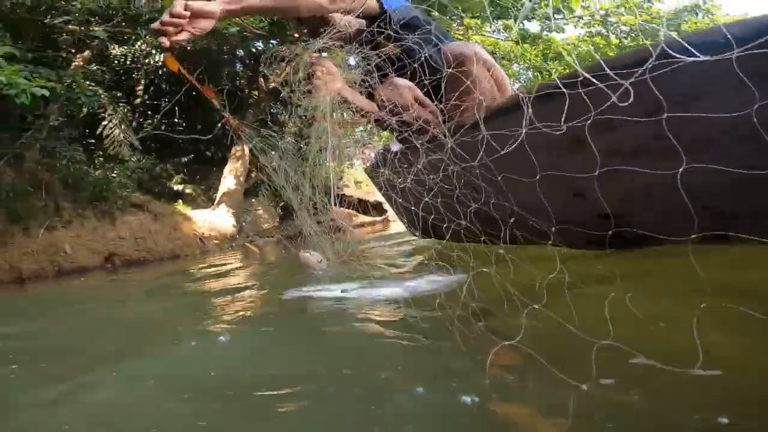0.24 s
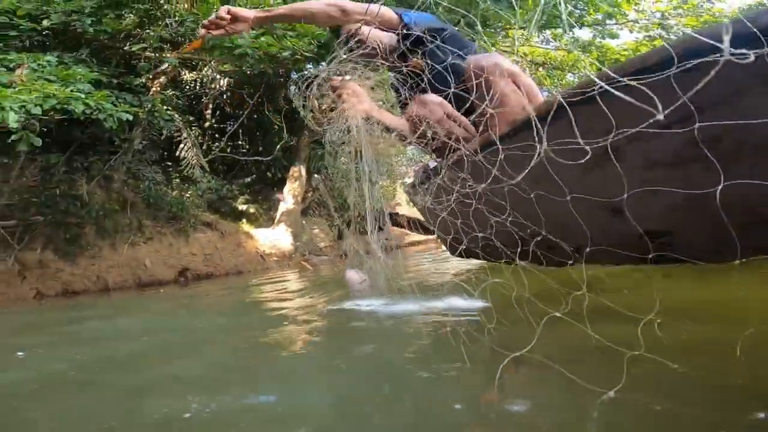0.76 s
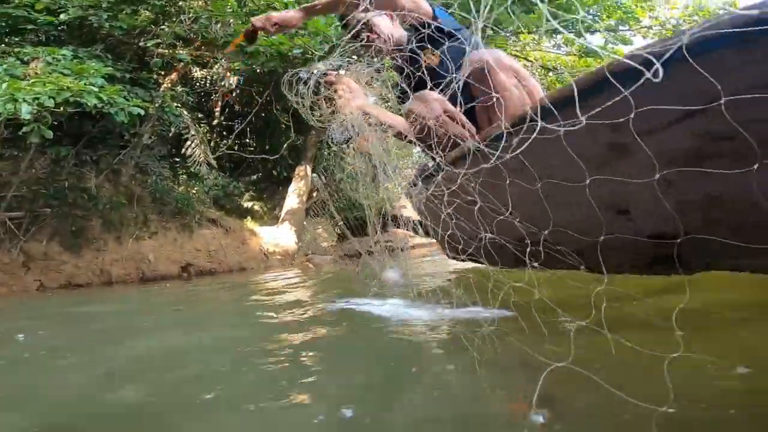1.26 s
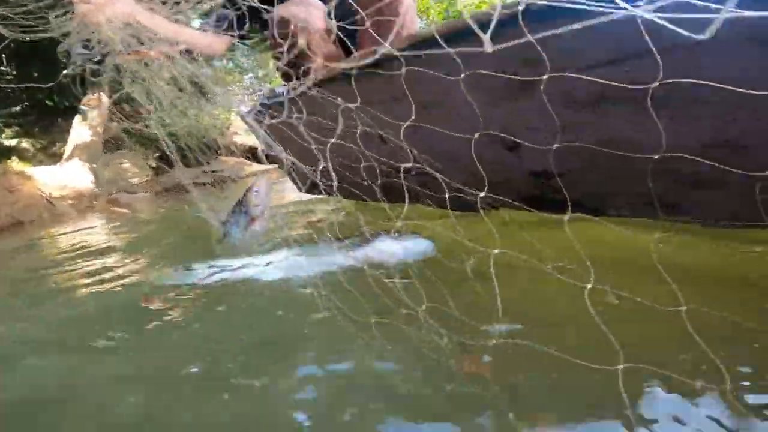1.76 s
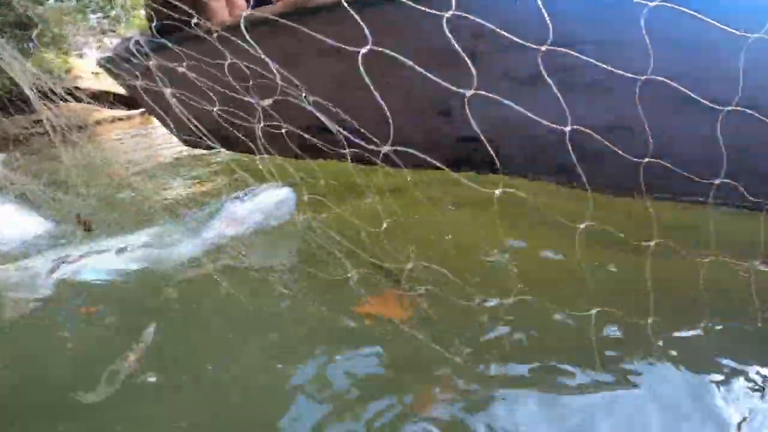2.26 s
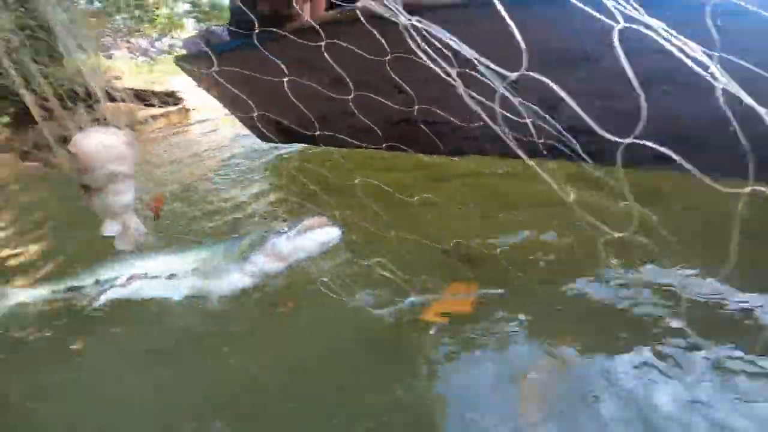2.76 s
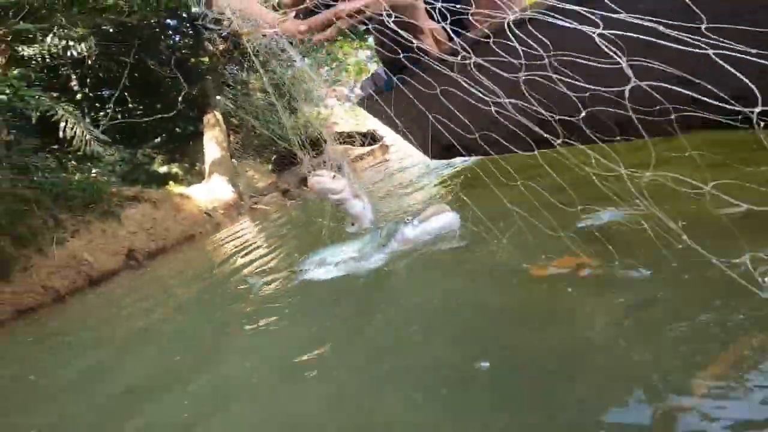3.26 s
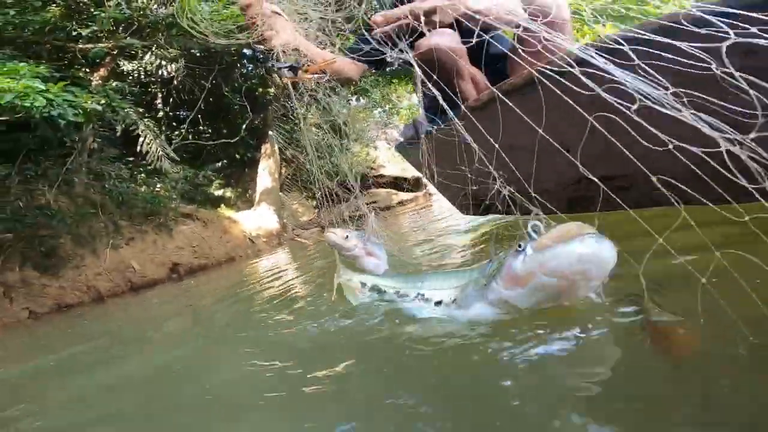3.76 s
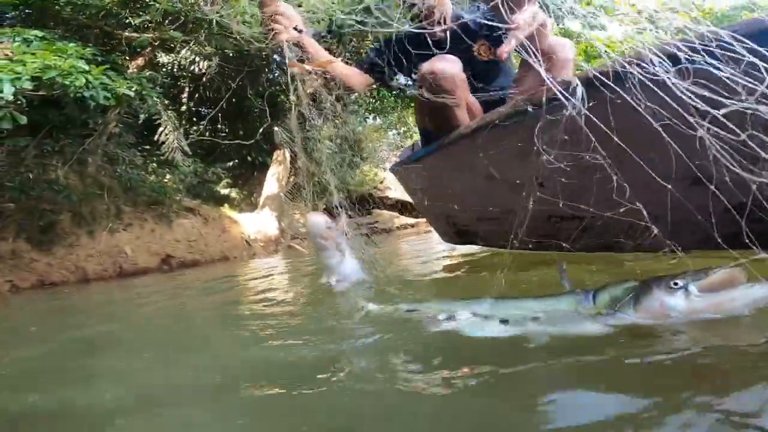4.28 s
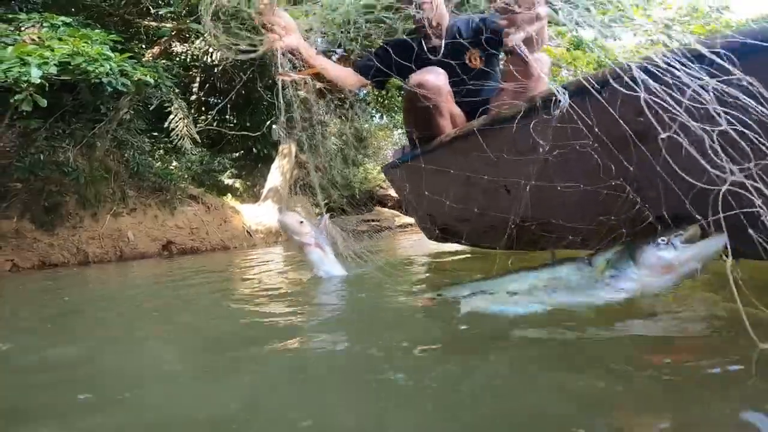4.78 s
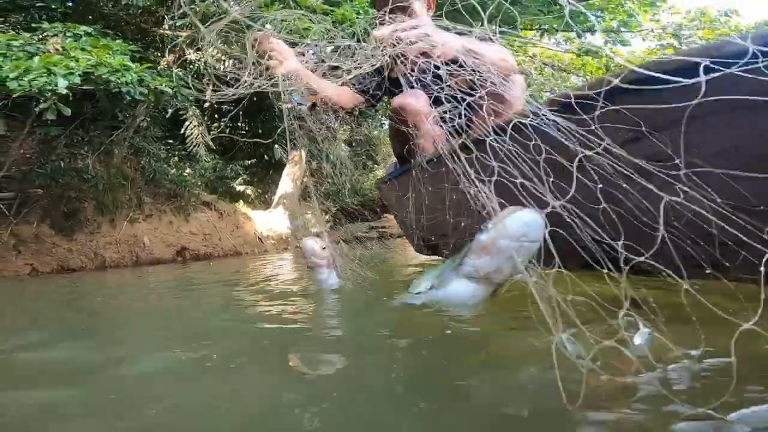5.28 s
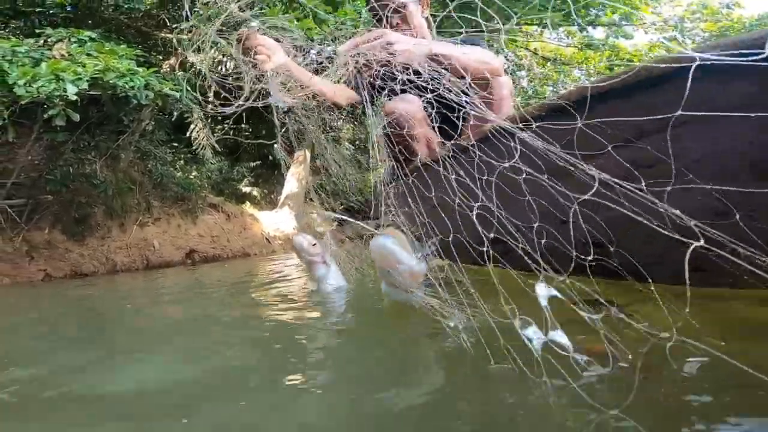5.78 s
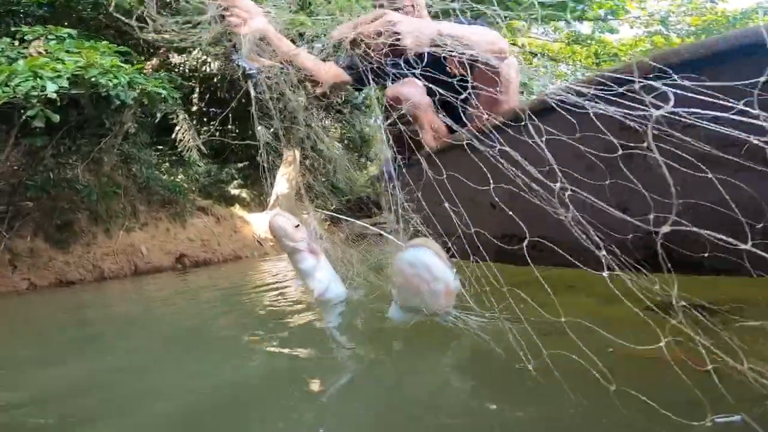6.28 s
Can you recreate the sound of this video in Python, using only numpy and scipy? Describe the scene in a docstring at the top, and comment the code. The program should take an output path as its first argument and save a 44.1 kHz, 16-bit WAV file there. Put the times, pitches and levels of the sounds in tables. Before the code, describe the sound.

Close, boxy and muffled sound from a waterproof-cased camera just above a river. A wet net is pulled in jerks: grainy scraping, hollow knocks, dry snaps, fizzing water and a quick gurgle at first. It eases, then a busier cluster of knocks and drips peaks past the middle. Afterwards come droplets, a short creak, near quiet and a few light rubs over faint low rumble.

```python
"""On a river, a wet fishing net is hauled into a wooden boat, heard by a waterproof camera just above the water.
Net: grainy noise gated by jerks rubs with each pull; struck case modes knock dully; noise bursts snap and flick spray.
Water: crowds of decaying sines are the bubbles that churn, crackle, gurgle, drip and drain.
Boat and air: a taut line creaks in a train of rasps, low swings bump the hull, a hollow note wanders.
The moving camera rumbles in low noise over a very quiet bank; the air in its case colours everything."""
import sys
import numpy as np
from scipy import signal
from scipy.fft import rfft, irfft, next_fast_len
from scipy.io import wavfile
from scipy.ndimage import uniform_filter1d

SR = 44100
rng = np.random.default_rng(int(sys.argv[2]) if len(sys.argv) > 2 else 0)


def inscribe(sig):
    """Save sig as 16-bit PCM at rate SR to the path in sys.argv[1].

    A 1-D sig is mono; a 2-D sig holds one channel per row.
    Samples are clipped to [-1, 1] before scaling.
    """
    pcm = np.round(np.clip(np.atleast_2d(sig).T, -1, 1) * 32767)
    wavfile.write(sys.argv[1], SR, pcm.astype(np.int16))


N = 287973
T = np.arange(N) / SR
TOP_HZ = 8300  # above this the treble is faint

# All source levels are relative, ahead of the ports and the case.
# Sway of the camera. Each row: time in seconds, rumble level in dB.
SWAY = [(0.0, -36), (0.14, -43), (0.95, -41.5), (1.28, -52), (1.98, -44), (2.25, -49), (2.7, -46.5),
        (2.95, -42.5), (3.7, -39.5), (3.88, -48), (5.27, -53), (5.4, -57), (5.68, -59), (5.91, -75),
        (6.2, -55.5), (6.53, -44)]


def undb(db):
    """Decibels to gain."""
    return 10 ** (np.asarray(db) / 20)


def curves(table):
    """Each column of a table, joined by straight lines in time."""
    s, *columns = np.transpose(table)
    return [np.interp(T, s, c) for c in columns]


def across(table, freqs):
    """Each column of a table, joined by straight lines in log frequency."""
    hz, *columns = np.transpose(table)
    log_freqs = np.log(np.maximum(freqs, 1))
    log_hz = np.log(np.maximum(hz, 1))
    return [np.interp(log_freqs, log_hz, c) for c in columns]


def shaped(x, response):
    """Filter by a response given as a function of frequency."""
    size = next_fast_len(N + SR // 10)
    return irfft(rfft(x, size) * response(np.fft.rfftfreq(size, 1 / SR)), size)[..., :N]


def colour(x, table):
    """Filter by the gains of a (Hz, dB) table."""
    return shaped(x, lambda f: undb(across(table, f)[0]))


def band(x, lo_hz, hi_hz, order=3):
    """Causal Butterworth band-pass."""
    edges_hz = [lo_hz, min(hi_hz, SR / 2 - 1)]
    return signal.sosfilt(signal.butter(order, edges_hz, "band", fs=SR, output="sos"), x)


def unit(x):
    """Scale to rms 1."""
    return x / np.sqrt(np.mean(x ** 2))


def peak(x):
    """Scale to peak 1."""
    return x / np.abs(x).max()


def fade(t, t60_s):
    """Exponential decay of 60 dB in t60_s."""
    return np.exp(-np.log(1000) * t / max(t60_s, 1 / SR))


def add(out, s, x):
    """Mix a short sound in at s seconds."""
    i = max(int(s * SR), 0)
    out[i:i + len(x)] += x[:max(N - i, 0)]


def walk(rate_hz):
    """Random levels, rate_hz new ones a second, joined by ramps; rms 1."""
    k = int(SR / rate_hz)
    held = np.repeat(rng.standard_normal(N // k + 1), k)
    return unit(uniform_filter1d(held, k)[:N])


def slips(rate_hz, spread_db):
    """Two unrelated streams of tiny clicks at random times, their sizes spread exponentially in dB."""
    chance = rng.random((2, N))
    size = np.minimum(rng.exponential(size=(2, N)), 4)
    sign = rng.choice([-1, 1], (2, N))
    return unit((chance < rate_hz / SR) * undb(spread_db * size) * sign)


def ports(shared, apart=None):
    """Two microphone ports differ in level and phase; a spread-out source reaches them less alike in the treble."""
    # Each row: frequency in Hz, left minus right in dB, left lead in rad, likeness 0-1.
    port_rows = [(60, 1.8, 0, .98), (300, 1.6, -.12, .95), (520, 2.2, -.15, .92), (780, 4.2, .2, .88),
                 (1300, 3.4, -.25, .88), (1900, 6, 0, .85), (2800, 8.5, -.65, .8), (3600, 5, -.6, .65),
                 (4700, -4, -2.1, .55), (6000, 1.5, -2.3, .4), (8000, 2.5, -.6, .2)]

    def ear(f, side):
        balance_db, lead_rad, _ = across(port_rows, f)
        return undb(side * balance_db / 2) * np.exp(1j * lead_rad * min(side, 0))

    def likeness(f):
        return np.clip(across(port_rows, f)[2], 0, 1)

    if apart is None:
        return np.array([shaped(shared, lambda f: ear(f, side)) for side in (1, -1)])
    shared = shaped(shared, lambda f: np.sqrt((1 + likeness(f)) / 2))
    apart = shaped(apart, lambda f: np.sqrt((1 - likeness(f)) / 2))
    return np.array([shaped(shared + side * apart, lambda f: ear(f, side)) for side in (1, -1)])


def bubble(t, hz, t60_s, rise):
    """A trapped air bubble rings and rises in pitch as it nears the surface."""
    glide = 1 + rise * np.minimum(t / t60_s, 1)
    return np.sin(2 * np.pi * np.cumsum(hz * glide) / SR) * fade(t, t60_s)


def bank(hush_db=-80.5, hiss_db=-96):
    """A faint, slightly wavering noise hush with a thin high hiss above it."""
    # Each row: frequency in Hz, relative gain in dB.
    bank_colour = [(35, -28), (60, 6.5), (124, -10), (532, -15.5), (616, -8.5), (820, -23.5), (1390, -10.5),
                   (2000, -30.5), (2380, -18.5), (2530, -27.5), (2810, -19.5), (3390, -38.5), (4600, -28.5),
                   (5900, -30), (7310, -26), (8630, -37.5), (11200, -43.5), (19000, -120)]
    hush = colour(rng.standard_normal((2, N)) * undb(0.6 * walk(rate_hz=10)), bank_colour)
    hush *= undb(hush_db) / band(hush, 300, 9000).std()
    hiss = unit(band(rng.standard_normal((2, N)), 6950, 7950, order=4))
    return ports(*hush) + undb(hiss_db) * hiss


def rumble():
    """The swaying camera flexes its case: deep, lumpy noise from one signal at both ports."""
    lumps = rng.standard_normal(N) * undb(1.0 * walk(rate_hz=8.5))
    deep = colour(lumps, [(8, -15.5), (20, 8.0), (40, 2.5), (55, -1.5), (80, -8.0), (110, -21.0),
                          (160, -28.5), (300, -70.5), (600, -100)])
    return ports(unit(deep) * undb(curves(SWAY)[0]))


def hollow(width_hz=14):
    """A narrow resonance of the air between camera and water glides up and down, fluttering apart at each port."""
    # Each row: time in seconds, pitch in Hz, level in dB.
    note_rows = [(4.6, 301, -100), (4.85, 340, -78), (4.95, 261.7, -86), (5.13, 367, -86.5),
                 (5.46, 265, -84), (5.53, 316, -93), (5.58, 233.3, -79.5), (5.68, 396.5, -84),
                 (5.8, 287, -83), (5.92, 379, -82), (6.03, 308, -81), (6.13, 250, -68.5), (6.26, 344, -83),
                 (6.5, 303, -81)]
    hz, db = curves(note_rows)
    lowpass = signal.butter(2, width_hz, fs=SR, output="sos")
    flutter = signal.sosfilt(lowpass, rng.standard_normal((2, 2, N)))
    carrier = np.exp(2j * np.pi * np.cumsum(hz) / SR)
    note = np.real((flutter[0] + 1j * flutter[1]) * carrier)
    return unit(note) * undb(db)


def bumps(t60_s=0.031):
    """A soft shove on the hull: one low swing that is damped almost at once."""
    # Each row: time in seconds, peak in dB, pitch in Hz.
    bump_rows = [(0.439, -30.5, 54.7), (1.998, -34.5, 72), (3.2, -36, 84), (3.412, -36.5, 72),
                 (3.475, -34.5, 71.4), (3.862, -43, 106), (4.74, -44.5, 85), (4.846, -45.5, 91),
                 (5.031, -45, 85), (5.147, -44, 98), (5.254, -45, 70)]
    out, t = np.zeros(N), T[:SR // 10]
    for s, db, hz in bump_rows:
        swing = t * np.sin(2 * np.pi * hz * t) * fade(t, t60_s)
        add(out, s, -undb(db) * peak(swing))
    return ports(out)


def gurgles(spread_octaves=0.42, count=14):
    """A slop of water traps a cluster of large, short-lived bubbles that swells and dies away."""
    # Each row: start in seconds, length in seconds, level in dB, centre pitch in Hz.
    gurgle_rows = [(0.316, 0.14, -50.5, 657), (4.305, 0.082, -64, 443), (4.711, 0.07, -65, 485),
                   (4.757, 0.13, -66.5, 186), (5.299, .14, -68, 477), (5.612, 0.17, -74, 520)]
    out, t = np.zeros(N), T[:SR // 10]
    for (s, length_s, db, hz), chance in zip(gurgle_rows, rng.random((len(gurgle_rows), count, 3))):
        cluster = np.zeros(SR // 3)
        for k, (when, size, strength) in enumerate(chance):
            place = (k + when) / count
            pitch_hz = hz * 2 ** (spread_octaves * (2 * size - 1))
            pop = bubble(t, pitch_hz, 12 / pitch_hz, rise=0.1)
            add(cluster, place * length_s, np.sin(np.pi * place) * (0.5 + strength) * pop)
        add(out, s, undb(db) * cluster / np.linalg.norm(cluster) * np.sqrt(length_s * SR))
    return ports(out)


def wash(flow, lowest_hz=380, octaves=3.46, t60_cycles=13, spread_db=-4.0, tilt_db=-10.0, level_db=-6,
         count=1300):
    """Water churned by the mesh: a crowd of short-lived bubbles of all sizes, weaker by the tilt per octave up."""
    out, t = np.zeros(N), T[:SR // 25]
    for when, size, strength in rng.random((count, 3)):
        hz = lowest_hz * 2 ** (octaves * size)
        db = spread_db * min(-np.log(1 - strength), 3) + tilt_db * octaves * size
        add(out, when * N / SR, undb(db) * bubble(t, hz, t60_cycles / hz, rise=0.45))
    return ports(unit(out) * flow * undb(level_db))


def trickle(shake, lowest_hz=900, octaves=7.4, t60_cycles=22, level_db=-64, spread_db=2.0, count=150):
    """The raised mesh keeps shedding small drops, more loudly when it is shaken."""
    out, t = np.zeros(N), T[:SR // 16]
    for when, size, strength in rng.random((count, 3)):
        hz = lowest_hz * 2 ** (octaves * size)  # beyond SR / 2 it folds back, very faint and brief
        loudness = undb(spread_db * min(-np.log(1 - strength), 3)) * lowest_hz / hz
        drop = bubble(t, hz, t60_cycles / hz, rise=0.13) * (1 - fade(t, 5 / hz))
        add(out, when * N / SR, loudness * drop)
    shake_db = 20 * np.log10(shake)
    return ports(out * undb(level_db + 0.55 * (shake_db - shake_db.mean())))


def drain(lowest_hz=1000, octaves=2.1, t60_cycles=16, spread_db=12, tilt_db=-1.0, count=130):
    """Fine droplets patter from the lifted net onto the river, each a tiny, quickly damped bubble."""
    # Each row: time in seconds, level of the strongest droplets in dB.
    drain_rows = [(3.9, -84), (4.15, -54), (4.3, -69), (4.55, -60), (4.75, -75), (4.919, -60.5), (5.1, -55),
                  (5.25, -62), (5.45, -85)]
    out, t = np.zeros(N), T[:SR // 30]
    times, levels_db = np.transpose(drain_rows)
    for when, size, strength in rng.random((count, 3)):
        s = times[0] + when * (times[-1] - times[0])
        hz = lowest_hz * 2 ** (octaves * size)
        db = np.interp(s, times, levels_db) - spread_db * strength + tilt_db * octaves * size
        add(out, s, undb(db) * bubble(t, hz, t60_cycles / hz, rise=0.15))
    return ports(out)


def drops(splat_t60_s=0.014, wet_db=8):
    """Water off the net: a brief noise splat and a tiny bubble that bursts at once; the row at 3.657 s instead
    gives the hard knock there its bright click."""
    # Each row: time in seconds, peak in dB, pitch in Hz, relative splat in dB (wet_db is added).
    drop_rows = [(0.169, -32, 2560, -9), (0.188, -39, 4860, -19), (0.294, -46, 3200, -4),
                 (0.7836, -56, 4200, 22), (0.798, -39.5, 3850, 8), (0.8622, -51, 2950, -5),
                 (1.3686, -51.5, 2880, -6), (1.7925, -50, 2630, 4), (1.9493, -51, 2450, -16),
                 (2.066, -49.5, 2970, -9), (2.882, -60, 2600, 21), (2.933, -52, 3100, -8),
                 (3.0004, -52.5, 3380, -9), (3.13, -40.5, 3030, -11), (3.477, -48, 2440, 8),
                 (3.6573, -34, 1970, -7.5), (3.925, -56, 2930, 7), (4.2409, -56, 3200, 2),
                 (4.534, -49.5, 4270, -4), (4.6658, -53, 4700, -11), (4.691, -57.5, 3700, 15),
                 (5.1878, -55.5, 2820, -21)]
    out, t = np.zeros(N), T[:SR // 10]
    for (s, db, hz, splat_db), noise in zip(drop_rows, rng.standard_normal((len(drop_rows), len(t)))):
        splat = peak(band(noise * fade(t, splat_t60_s), hz * 0.72, hz * 1.396))
        ring = bubble(t, hz, 0.032, rise=0.06) * fade(t, 0.025)  # bursting damps it further
        add(out, s, undb(db) * peak(ring + undb(splat_db + wet_db) * splat))
    return ports(out)


def ringing_bubbles(plop_db=-7, plop_t60_s=0.0037):
    """Some bubbles ring on clearly after a soft noise plop."""
    # Each row: time in seconds, level in dB, pitch in Hz, t60 in seconds.
    bubble_rows = [(0.002, -43, 2910, 0.021), (0.017, -47, 4980, 0.01), (1.01, -45, 1070, 0.018),
                   (1.011, -55.5, 2730, 0.027), (1.039, -43.5, 1270, 0.02), (1.7, -52.5, 3120, 0.021),
                   (3.109, -47.5, 2520, 0.009), (3.133, -41.5, 4400, 0.01), (3.318, -40.5, 1380, 0.013),
                   (3.863, -50.5, 2930, 0.023), (4.179, -47.5, 1200, 0.022), (4.242, -46, 2680, 0.013),
                   (4.534, -62.5, 3400, 0.056), (4.578, -55, 1423, 0.03), (4.808, -51.5, 1626, 0.022),
                   (4.857, -66, 3040, 0.031), (5.004, -53.5, 1215, 0.029), (5.053, -52, 1104, 0.072),
                   (5.345, -52, 477, 0.04), (5.434, -60, 4800, 0.016), (6.432, -48, 1490, 0.011)]
    out, t = np.zeros(N), T[:SR // 10]
    for (s, db, hz, t60_s), noise in zip(bubble_rows, rng.standard_normal((len(bubble_rows), len(t)))):
        plop = peak(band(noise * fade(t, plop_t60_s), hz * 0.8, hz * 1.29))
        ring = bubble(t, hz, t60_s, rise=0.2) * (1 - fade(t, 0.0069))
        add(out, s, undb(db) * (ring + undb(plop_db) * plop))
    return ports(out)


def spray():
    """Brief bright puffs of tiny droplets flicked off the mesh."""
    # Each row: start in seconds, length in seconds, level in dB.
    spray_rows = [(0.145, 0.022, -69), (0.196, 0.034, -70), (0.383, 0.029, -74), (0.752, 0.027, -63),
                  (0.772, 0.031, -61), (0.793, 0.021, -58), (3.228, 0.13, -73.5), (3.377, 0.11, -76)]
    # Each row: frequency in Hz, relative gain in dB.
    spray_colour = [(1500, -32), (3000, 12.5), (5500, 5.5), (8000, -9), (11000, 6), (13000, -8.5),
                    (16000, -14)]
    puffs = np.zeros(N)
    for s, length_s, db in spray_rows:
        add(puffs, s, undb(db) * np.hanning(int(length_s * SR)))
    droplets = unit(colour(slips(rate_hz=6000, spread_db=-4), spray_colour))
    return ports(*(droplets * puffs))


def creak(slip_rate_hz=92, swish_db=-27, edge_db=-9, size_db=3, rasp_t60_s=0.0046, count=40):
    """A taut wet strand sticks and slips over the boat's edge: a quick, uneven train of rasps in a thin swish."""
    # Each row: time in seconds, level in dB.
    creak_rows = [(4.98, -62), (5.04, -56), (5.12, -51), (5.16, -59), (5.21, -62), (5.27, -60), (5.33, -80)]
    start_s, end_s = creak_rows[0][0], creak_rows[-1][0]
    gap, size = rng.standard_normal((count, 2)).T
    times = start_s + np.cumsum(np.exp(0.35 * gap)) / slip_rate_hz
    grip, t = np.zeros(N), T[:SR // 50]
    for s, db in zip(times, size_db * np.clip(size, -2, 1)):
        add(grip, s, undb(db) * fade(t, rasp_t60_s))
    noise = grip * rng.standard_normal(N)
    rasps = band(noise, 2300, 3040, order=2) + undb(edge_db) * band(noise, 1300, 4400)
    swish = unit(band(rng.standard_normal(N), 2400, 3200, order=2)) * (T > start_s) * (T < end_s)
    return ports((peak(rasps) + undb(swish_db) * swish) * undb(curves(creak_rows)[0]))


def snaps(snap_t60_s=0.013, edge_db=-22):
    """A wet strand lets go with one dry, very short tick of noise."""
    # Each row: time in seconds, peak in dB.
    snap_rows = [(0.0623, -50), (0.3506, -53), (0.366, -59), (0.381, -51), (0.557, -53), (0.618, -58),
                 (0.966, -60), (1.24, -49), (1.412, -53), (2.894, -52), (3.077, -50.5), (3.2516, -56),
                 (3.399, -47.5), (3.421, -54), (3.485, -47.5), (3.6263, -49), (4.397, -52.5),
                 (4.5324, -49.5), (5.0797, -51.5), (5.19, -68)]
    out, t = np.zeros(N), T[:SR // 40]
    for (s, db), noise in zip(snap_rows, rng.standard_normal((len(snap_rows), len(t)))):
        burst = noise * fade(t, snap_t60_s)
        tick = band(burst, 790, 4200) + undb(edge_db) * band(burst, 5400, 22000, order=2)
        add(out, s, undb(db) * peak(tick))
    return ports(out)


def crackle(sizzle_level, lowest_hz=1900, octaves=1.35, t60_cycles=8, spread_db=15, tilt_db=-4, level_db=-5,
            lean=1.2, count=1700):
    """Water films between the meshes burst under the pull: a crowd of ticks, each with its own pitch and place."""
    out, aside, t = np.zeros(N), np.zeros(N), T[:SR // 100]
    for k, (when, size, strength, place) in enumerate(rng.random((count, 4))):
        s = (k + 2 * when) / count * N / SR
        hz = lowest_hz * 2 ** (octaves * size)
        t60_s = t60_cycles / hz
        db = spread_db * strength ** 2 + tilt_db * octaves * size
        tick = undb(db) * bubble(t, hz, t60_s, rise=0) * (1 - fade(t, t60_s))
        add(out, s, tick)
        add(aside, s, tick * lean * (2 * place - 1))
    return ports(*(np.array([out, aside]) / out.std() * sizzle_level * undb(level_db)))


def knocks(reach_octaves=1.0, gain_db=-1, chatter_db=-13.5, chatter_s=0.0041, unlike_db=-2, wall_lag_s=0.0011):
    """A blow clicks, rings the case and thuds; the contact chatters on, and the wall carries it unevenly to the ports."""
    # Each row: time in seconds, level in dB, body pitch in Hz, thud and click in dB relative to the body.
    knock_rows = [(0.1045, -49, 900, -20, 14), (0.168, -47.5, 470, 14.5, 0),
                  (0.3796, -26.5, 770, -10, -11.5), (0.394, -31.5, 770, -4, -33),
                  (0.4472, -35, 600, -15, -17), (0.5577, -31, 454, -12, -14), (0.568, -38, 530, -3, 1),
                  (0.7038, -39, 600, -20, -7), (0.8041, -33, 726, -13, -13), (0.8111, -32.5, 550, -24, -21),
                  (1.134, -55.5, 746, -7, -1), (1.6422, -42.5, 550, -0.5, 0.5), (1.983, -33, 490, -10, -26),
                  (2.0158, -36, 546, -5.5, -11), (2.0293, -38, 910, -6.5, -7), (2.1381, -49, 580, -11, 3),
                  (2.3631, -58.5, 920, -5, 13), (2.4976, -43, 900, -24, -5), (2.5471, -43.5, 590, -4, 1),
                  (2.61, -40.5, 510, -17, 4), (2.6435, -37.5, 670, -2, -12),
                  (2.8504, -41, 396, -12.5, -1.5), (2.936, -39.5, 660, -6, 3), (3.194, -42, 397, 3, -8),
                  (3.204, -34, 370, -15, -6.5), (3.2499, -39, 443, 6.5, -4.5), (3.262, -34, 375, -2.5, -10),
                  (3.341, -40, 380, 3.5, -18), (3.48, -44, 487, -4, 0), (3.658, -24, 624, -3, 0),
                  (3.905, -46, 567, -11, 3), (3.9528, -69, 890, -6, 20), (4.2431, -48.5, 440, 0, -7),
                  (4.3984, -34.5, 363, -6, -12), (4.5594, -51.5, 507, 1.5, 7),
                  (4.6141, -39.5, 425, 0.5, -14), (5.874, -60, 477, -25, -16), (6.149, -51, 433, -3, -18)]
    # Modes of the case. Each row: frequency in Hz, t60 in seconds, level in dB.
    case_modes = [(105, 0.049, 0.5), (142.7, 0.024, 5), (192, 0.027, 1.5), (347, 0.021, -2.5),
                  (431, 0.015, 12.5), (873, 0.0084, 12), (1100, 0.015, 7.5), (1400, 0.015, 2.5),
                  (1550, 0.015, -3), (2903, 0.027, -13), (3470, 0.0037, -21)]
    out, t = np.zeros(N), T[:SR // 8]
    hz, t60_s, mode_db = np.transpose(case_modes)
    modes = np.array([undb(g) * np.sin(2 * np.pi * f * t) * fade(t, d) for f, d, g in zip(hz, t60_s, mode_db)])
    modes *= 1 - np.exp(-2 * hz[:, None] * t)  # low modes take longer to build up
    low, high = hz < 300, hz > 1000
    thud, click = peak(low @ modes), peak(high @ modes)
    grits = rng.standard_normal((len(knock_rows), len(t)))
    for (s, db, pitch_hz, thud_db, click_db), grit in zip(knock_rows, grits):
        nearness = 1 / (1 + (np.log2(hz / pitch_hz) / reach_octaves) ** 2)
        body = peak((~low & ~high) * nearness @ modes)
        ring = body + undb(thud_db) * thud + undb(click_db) * click
        chatter = grit ** 3 * t * np.exp(-t / chatter_s)
        push = undb(chatter_db) * chatter / np.linalg.norm(chatter)
        push[0] += 1  # the blow itself
        add(out, s, undb(db + gain_db) * signal.fftconvolve(push, ring)[:len(t)])
    return ports(out, undb(unlike_db) * np.roll(out, int(wall_lag_s * SR)))


def pulls(attack_s=0.013):
    """Scrape, drag and sizzle levels: each pull swells, holds and dies away; the slack mesh sways along."""
    # Each row: start, length and release t60 in seconds, scrape, low drag and wet sizzle levels in dB.
    pull_rows = [(0.01, 0.23, 0.58, -52, -60.5, -61.5), (0.057, 0.058, .2, -52, -60, -60.5),
                 (0.303, 0.016, 0.22, -51, -51.5, -58.5), (0.33, 0.069, 0.24, -49, -53.5, -59.5),
                 (0.443, 0.085, 0.47, -50, -54.5, -65.5), (0.6, 0.045, 0.49, -52.5, -60, -65.5),
                 (0.746, 0.068, 0.22, -60.5, -70, -66.5), (0.848, 0.17, 0.36, -65, -67, -71.5),
                 (1.14, 0.35, 0.84, -62, -66, -75), (1.548, 0.025, 0.28, -56.5, -56.5, -68),
                 (1.633, 0.03, 0.38, -55.5, -56, -74.5), (1.777, 0.22, 0.12, -58.5, -63.5, -75),
                 (1.984, 0.006, 0.044, -47, -68, -78), (2.016, 0.021, 0.19, -53.5, -57, -63.5),
                 (2.12, 0.14, 0.24, -62.5, -69, -81), (2.3, 0.054, 0.86, -59, -69, -70),
                 (2.546, 0.045, 0.14, -56, -73, -76), (2.641, 0.032, 0.11, -55.5, -62, -79),
                 (2.695, 0.047, 0.033, -63, -68, -104), (2.827, 0.017, 0.18, -54, -80, -69),
                 (2.927, 0.024, 0.58, -54, -58.5, -68.5), (3.139, 0.04, 0.22, -61.5, -63, -64),
                 (3.19, 0.065, 0.24, -61, -54, -65.5), (3.246, 0.073, .2, -57, -58, -59.5),
                 (3.358, 0.09, 0.31, -55.5, -51, -59.5), (3.482, 0.013, .15, -50, -55, -57.5),
                 (3.531, 0.063, 0.6, -53, -50.5, -61.5), (3.697, 0.12, 0.41, -68, -68.5, -81.5),
                 (3.81, 0.086, 0.52, -60.5, -67.5, -67.5), (4.34, 0.18, .28, -71, -67.5, -82),
                 (4.618, 0.01, 0.18, -55.5, -49.5, -76.5), (4.669, 0.056, 0.24, -71, -64.5, -79.5),
                 (4.955, 0.42, 0.15, -76.5, -78, -89), (5.626, 0.13, .5, -80.5, -75.5, -84.5),
                 (5.956, .09, 0.22, -82.5, -86, -84), (6.148, 0.045, .2, -69.5, -68.5, -88),
                 (6.215, 0.046, 0.23, -66.5, -66.5, -76), (6.305, 0.1, 0.26, -69.5, -71, -74.5),
                 (6.365, 0.044, 0.22, -61, -63.5, -73.5), (6.427, 0.049, 0.11, -62, -69, -66)]
    # Slack mesh: scrape, drag and sizzle in dB relative to the sway.
    slack_db = (-33, -29.5, -40.5)
    power = (undb(slack_db)[:, None] * undb(curves(SWAY)[0])) ** 2
    t = T[:SR] - attack_s
    for s, length_s, release_t60_s, *levels_db in pull_rows:
        effort = np.clip(1 + t / attack_s, 0, 1) * fade(np.maximum(t - length_s, 0), release_t60_s)
        for layer, db in zip(power, levels_db):
            add(layer, s - attack_s, (undb(db) * effort) ** 2)
    return np.sqrt(power)


def jerks(spread_db, count):
    """An uneven train of single jerks of unequal strength."""
    when, size = rng.random((count, 2)).T
    places = (np.arange(count) + 2 * when) / (count + 2)
    train = np.zeros(N)
    train[(places * N).astype(int)] = undb(spread_db * size ** 2)
    return train


def rubbing(scrape_level, drag_level, sizzle_level, low_hz=300, high_hz=1850, drag_gain_db=-2,
            scrape_gain_db=-2.5, sizzle_gain_db=-6.5, slip_t60_s=0.061, slide_db=-3, tug_db=-4):
    """Wet strands catch and slip in jerks: each tugs at the case and sheds low drag, grainy scrape and sizzle."""
    # Each row: frequency in Hz, relative gain in dB.
    rub_colour = [(100, 9.5), (160, 1), (210, -3.5), (280, -19), (360, -4), (450, -7.5), (610, -12.5),
                  (780, -10), (980, -11), (1200, -4.5), (1550, -12), (2300, -23), (2850, -19), (3600, -30),
                  (4400, -34.5), (8000, -51), (11000, -62.5)]

    def below(f, hz):
        return 1 / np.sqrt(1 + (f / hz) ** 12)

    def grains(lo_hz, hi_hz, spread_db, jerkiness):
        clicks = slips(rate_hz=3000, spread_db=spread_db) * catch ** jerkiness * undb(1.2 * walk(rate_hz=120))
        split = colour(clicks, rub_colour)
        return unit(shaped(split, lambda f: below(f, hi_hz) * (1 - below(f, lo_hz))))

    train = jerks(spread_db=21.0, count=640)
    slipping = unit(signal.fftconvolve(train, fade(T[:SR // 10], slip_t60_s))[:N])
    catch = unit(undb(slide_db) + slipping)  # a steady slide under the jerks
    tugs = unit(band(train, 77, 250, order=2))
    low_grains = grains(110, low_hz, spread_db=1.0, jerkiness=0.9)
    drag = (low_grains * undb(drag_gain_db) + tugs * undb(tug_db)) * drag_level
    scrape = grains(low_hz, high_hz, spread_db=-0.5, jerkiness=0.76) * scrape_level * undb(scrape_gain_db)
    sizzle = grains(high_hz, TOP_HZ, spread_db=0.0, jerkiness=0.55) * sizzle_level * undb(sizzle_gain_db)
    return ports(*(drag + scrape + sizzle))


def scene():
    """All sources at the two ports."""
    scrape, drag, sizzle = pulls()
    net = rubbing(scrape, drag, sizzle) + snaps() + creak()
    water = drops() + ringing_bubbles() + gurgles() + wash(scrape) + spray()
    water += trickle(scrape) + crackle(sizzle) + drain()
    return net + water + knocks() + bumps() + rumble() + hollow() + bank()


def record(dry, faint_treble_db=-14, limit_hz=15500):
    """The air cavity of the case colours everything; the sound is dull, with faint high treble."""
    # Resonances and dips of the trapped air. Each row: centre in Hz, width in Hz, gain in dB.
    cavity_rows = [(204.3, 16, 6), (413, 14, 2), (606, 73, -7.5), (794.5, 14, 3.5), (1735, 83, 3),
                   (2410, 170, -4), (2750, 55, 4), (4380, 23, 4.5), (5050, 80, 1.5), (5080, 240, 5),
                   (5760, 120, 7)]

    def cavity(f):
        return undb(sum(db / (1 + (2 * (f - hz) / width_hz) ** 2) for hz, width_hz, db in cavity_rows))

    boxed = shaped(dry, cavity)
    dulled = colour(boxed, [(TOP_HZ, 0), (TOP_HZ + 400, faint_treble_db)])
    return signal.sosfilt(signal.ellip(6, 0.3, 60, limit_hz, fs=SR, output="sos"), dulled)


dry = scene()
out = record(dry)
inscribe(out)
```